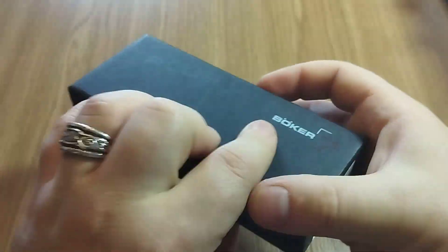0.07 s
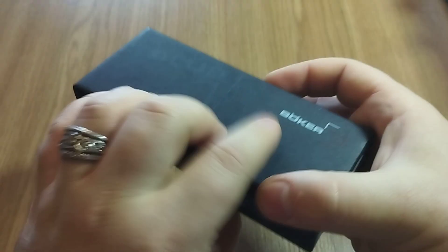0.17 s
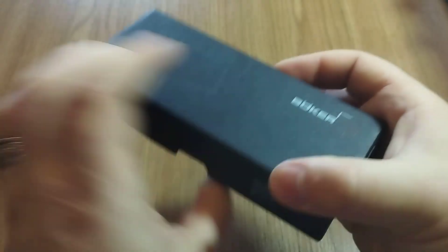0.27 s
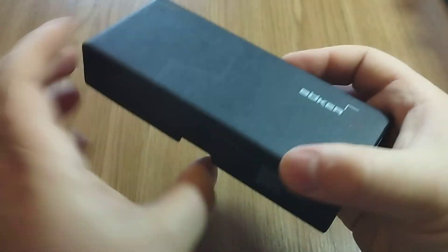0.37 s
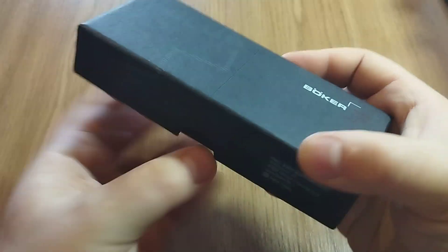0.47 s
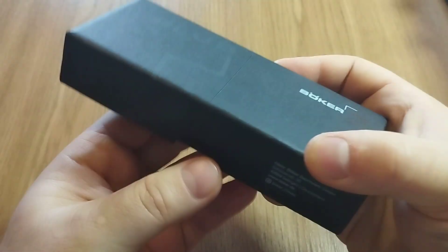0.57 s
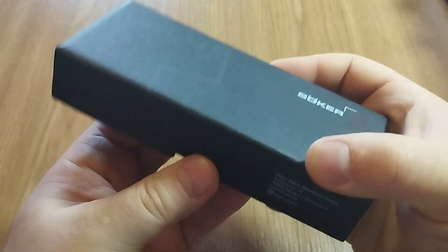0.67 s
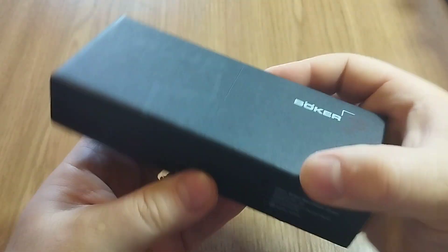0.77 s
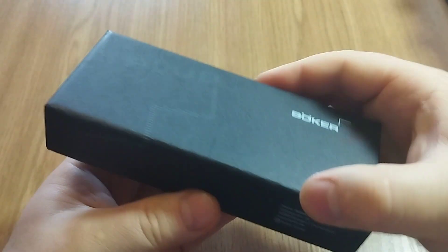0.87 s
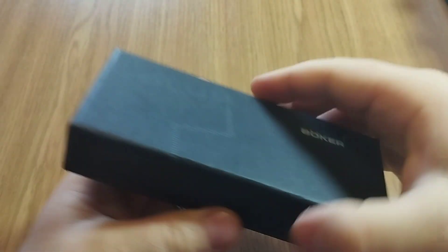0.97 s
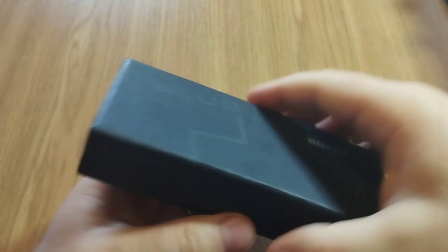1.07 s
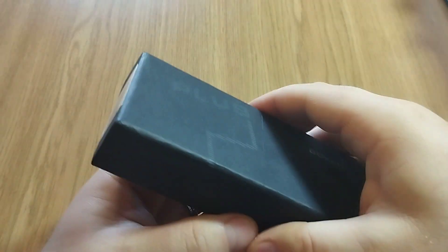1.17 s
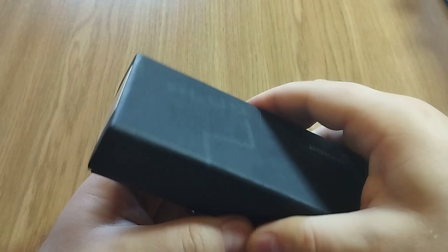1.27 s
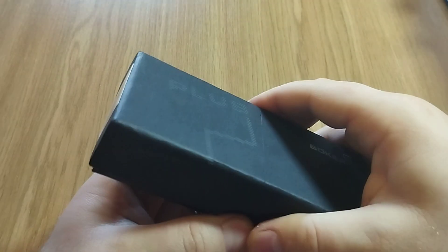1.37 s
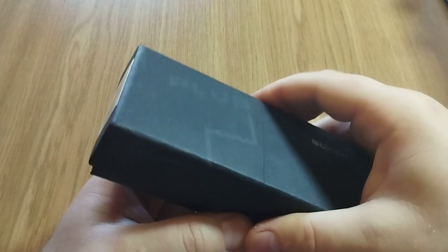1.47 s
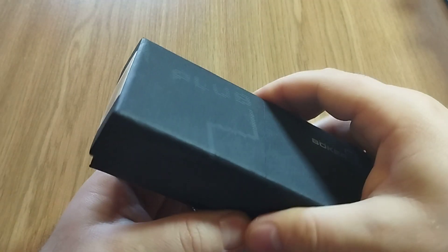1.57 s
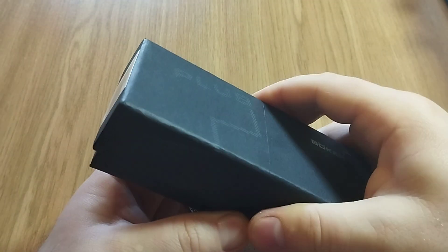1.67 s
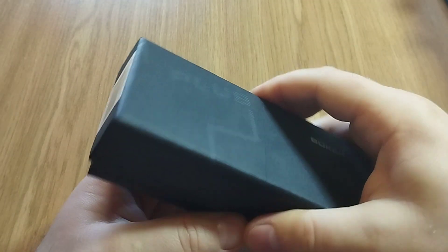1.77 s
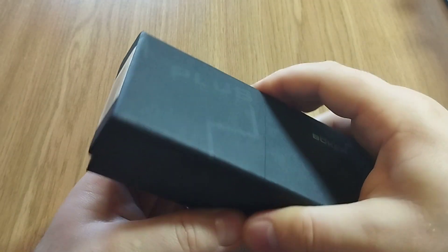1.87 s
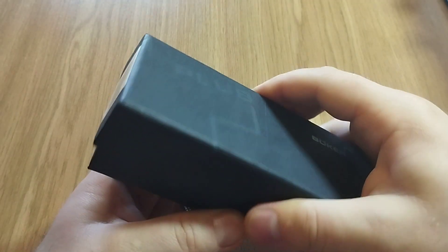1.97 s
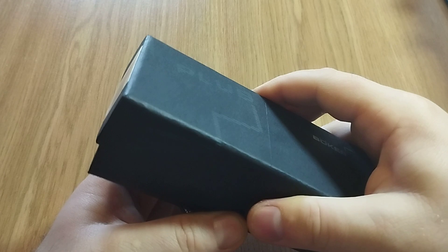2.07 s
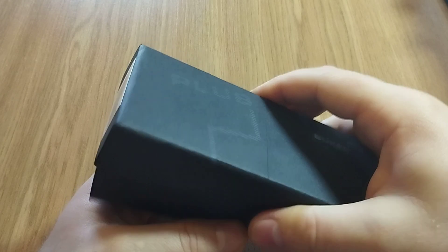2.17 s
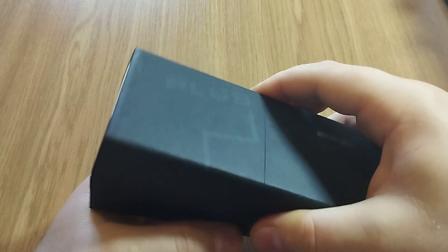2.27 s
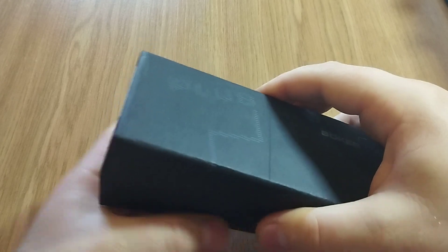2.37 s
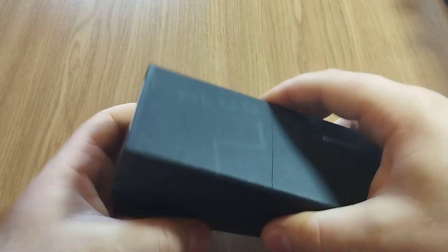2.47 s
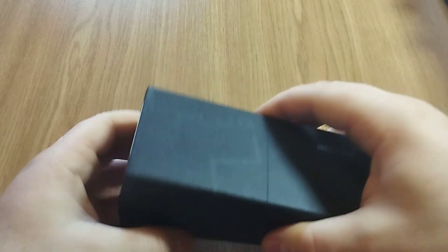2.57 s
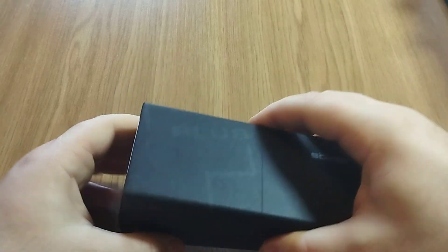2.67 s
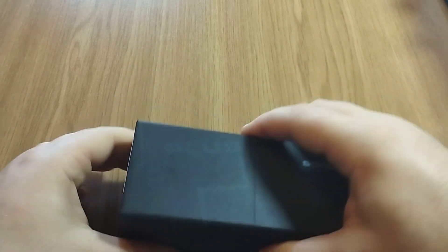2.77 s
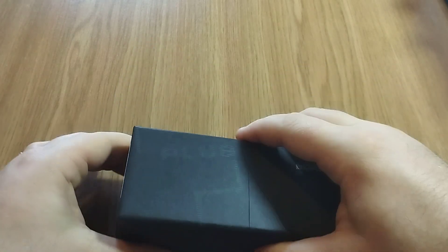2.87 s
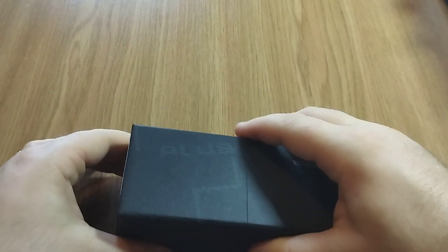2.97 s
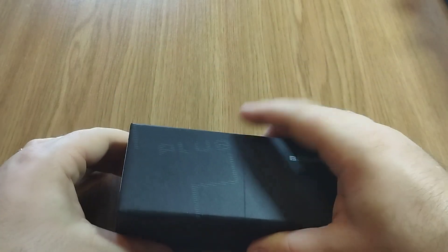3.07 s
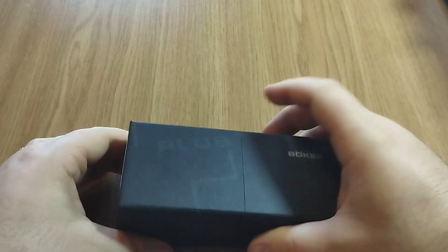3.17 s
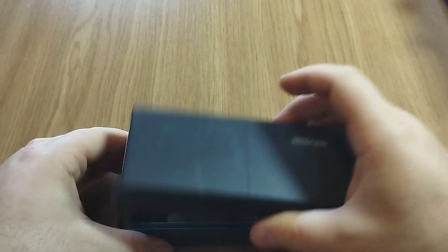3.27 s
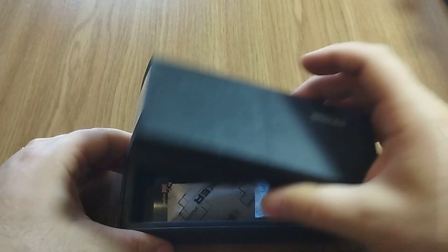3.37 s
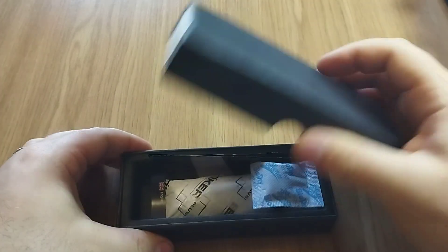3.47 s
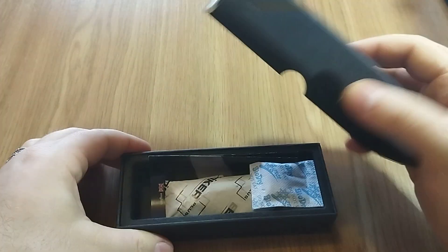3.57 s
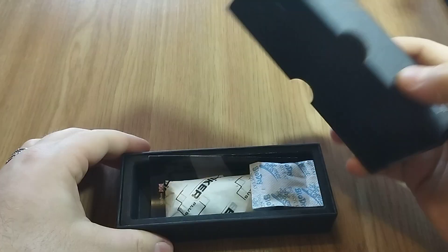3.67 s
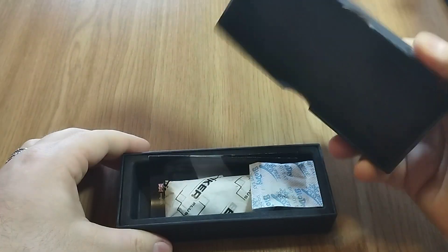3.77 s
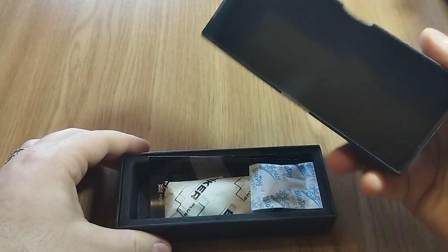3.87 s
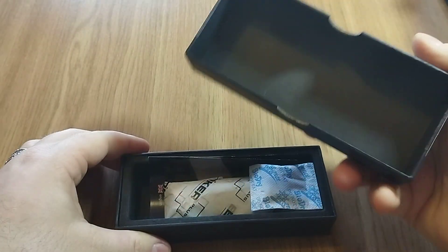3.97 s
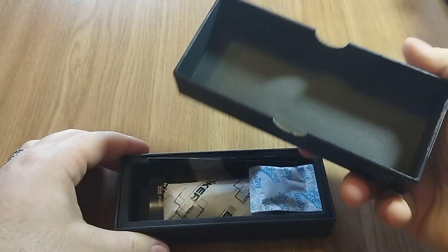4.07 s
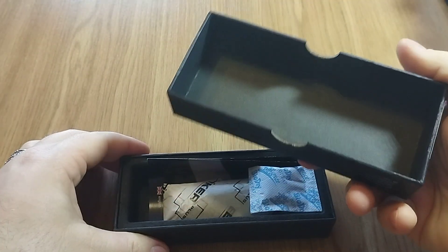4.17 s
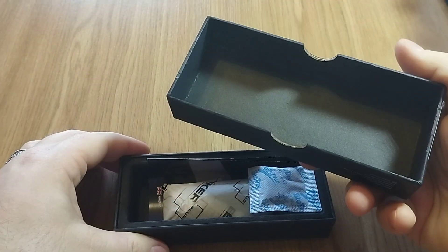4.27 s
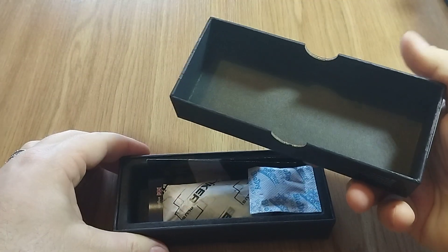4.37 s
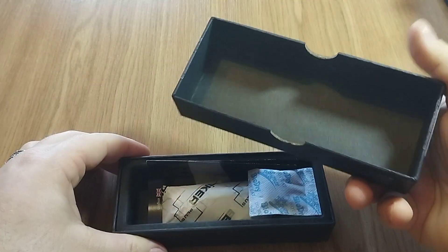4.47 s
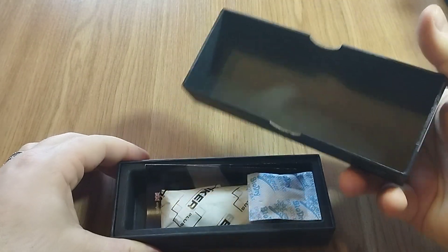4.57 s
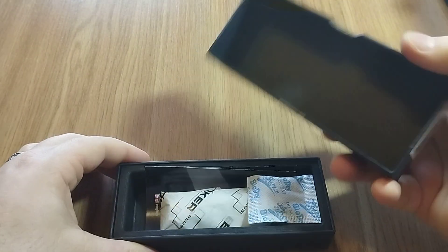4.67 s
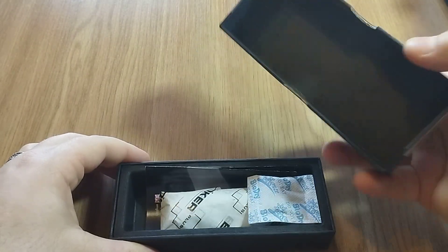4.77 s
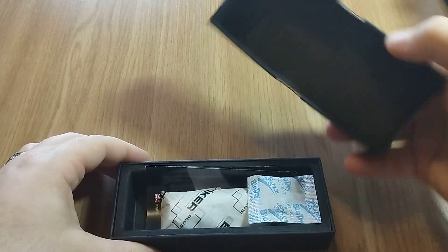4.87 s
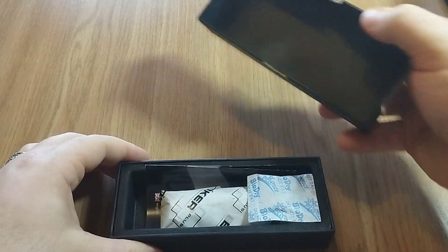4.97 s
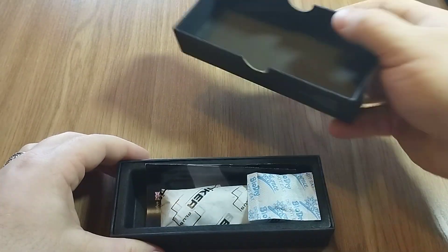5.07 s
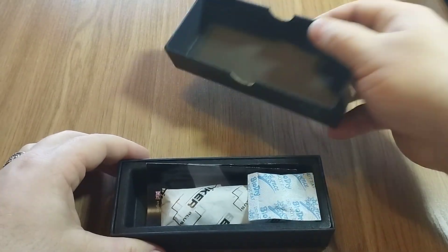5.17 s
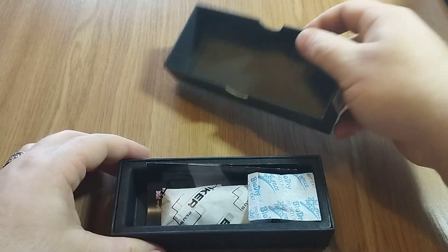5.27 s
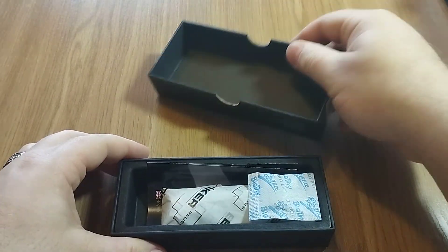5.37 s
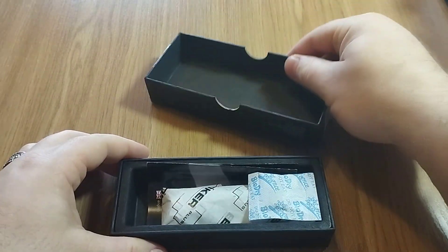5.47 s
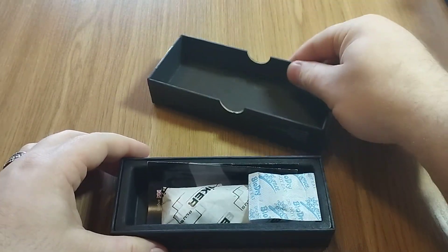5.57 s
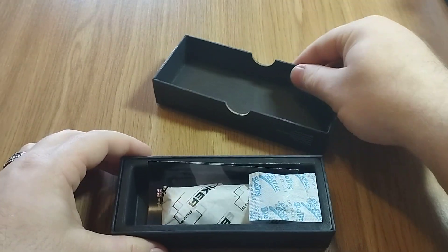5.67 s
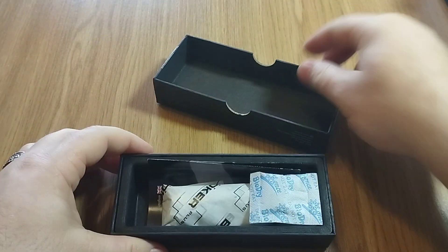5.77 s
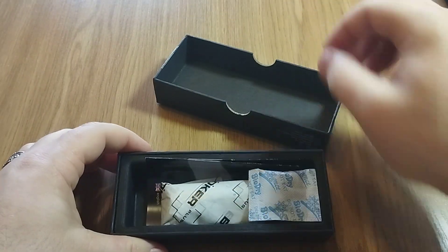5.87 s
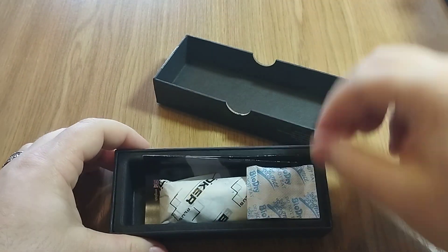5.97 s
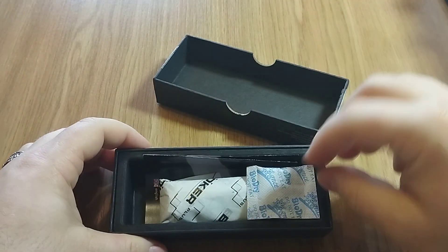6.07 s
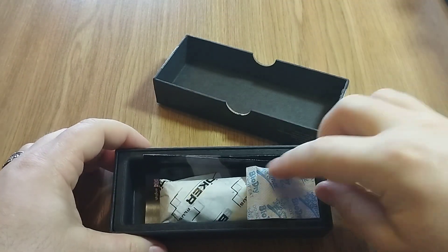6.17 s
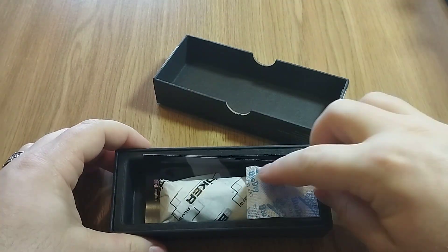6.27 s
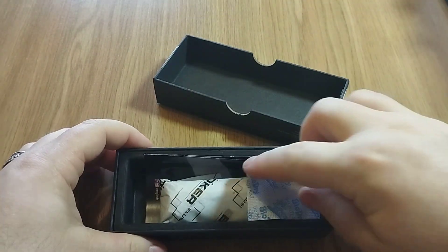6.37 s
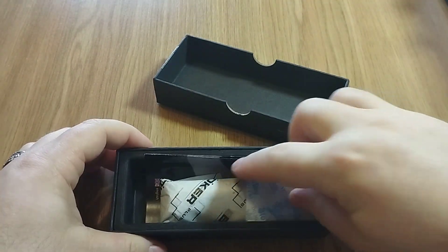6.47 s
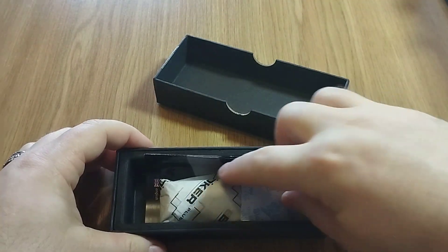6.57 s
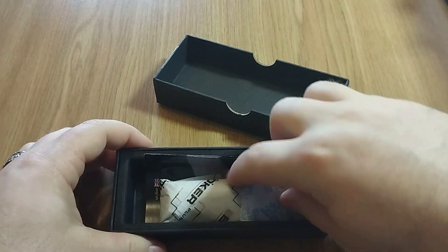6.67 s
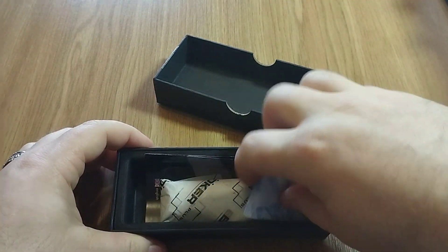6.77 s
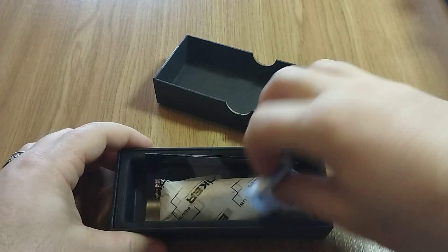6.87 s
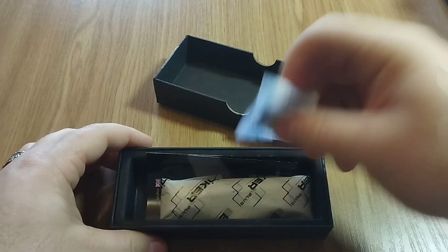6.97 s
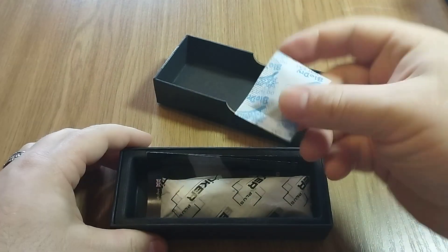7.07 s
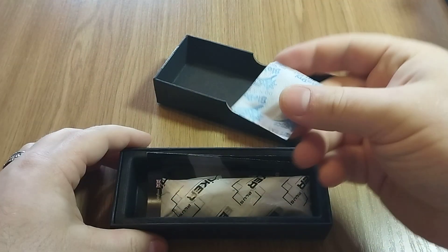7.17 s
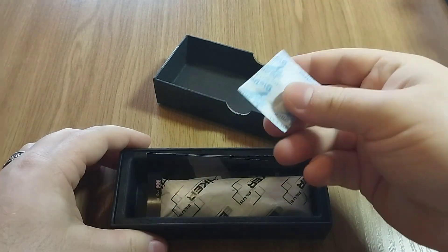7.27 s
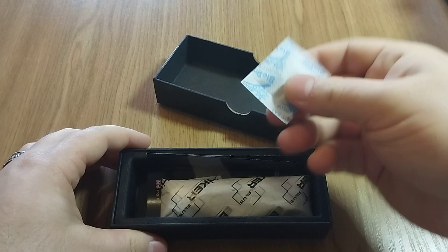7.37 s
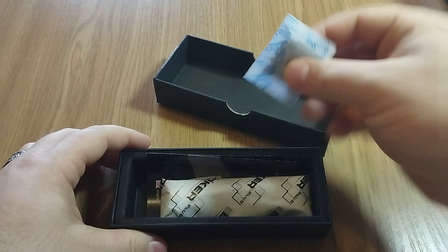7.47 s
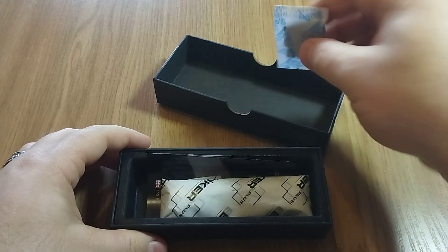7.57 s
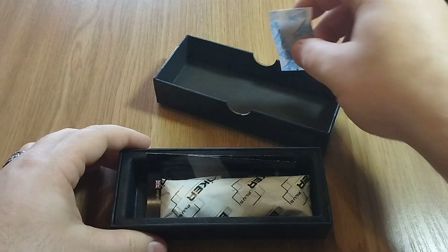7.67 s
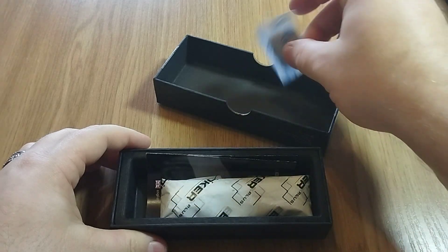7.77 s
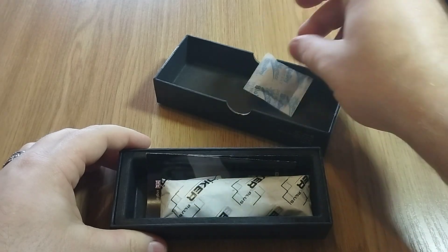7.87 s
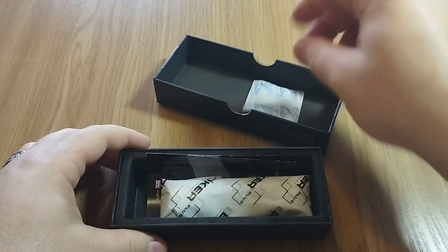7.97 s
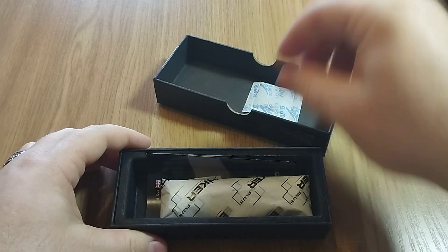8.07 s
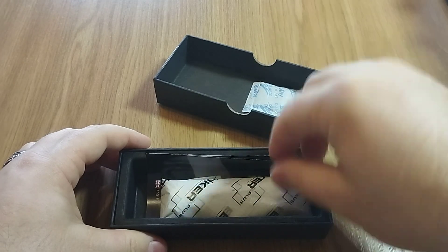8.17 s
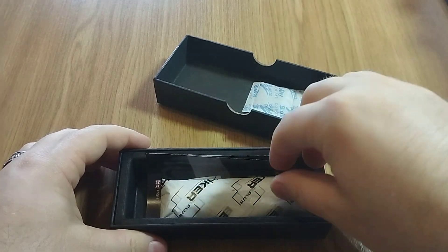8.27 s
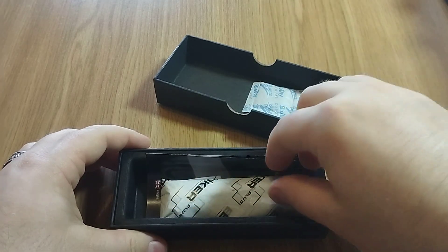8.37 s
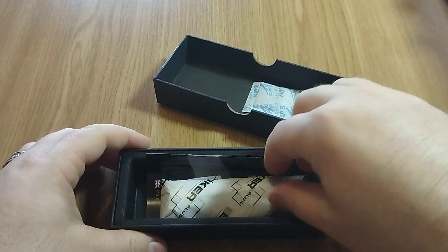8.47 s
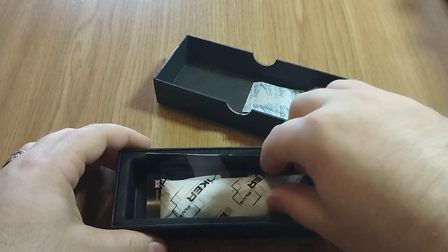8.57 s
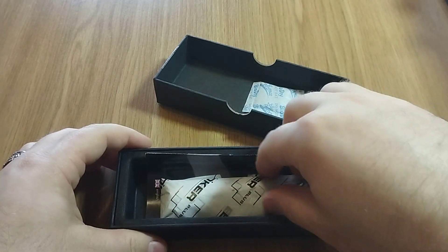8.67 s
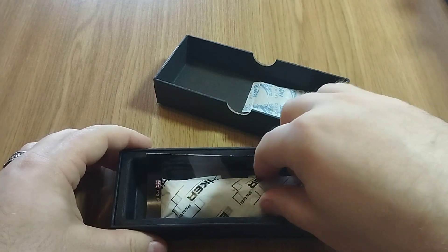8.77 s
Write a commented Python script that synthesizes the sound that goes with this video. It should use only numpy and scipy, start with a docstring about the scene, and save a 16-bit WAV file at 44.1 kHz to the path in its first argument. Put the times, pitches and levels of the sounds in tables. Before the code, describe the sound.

Hands ease the lid off a small cardboard box. Card slides on card in jerks, with soft hollow bumps, up to a sharp knock. Fingers rustle on the card, and the lid is set on a wooden table with a briefly ringing knock. A paper sachet is picked out with crinkles and snaps, followed by light taps. The microphone is close, in a quiet room with a deep rumble and faint hiss.

```python
"""In a quiet room with a deep rumble, hands ease the lid off a small cardboard box: card slides on card
in jerks and sets the hollow box humming, up to a sharp knock just after 3 s. Skin rustles on card, and
at 5.3 s the lid is set on a wooden table, where it knocks and rings. From 6.3 s the fingers pick out a
paper sachet with rustles and snaps, and a few light knocks on the lid end the scene.
All is heard through a close pair of faintly hissing microphone ports, each with a rumble of its own."""
import sys
import numpy as np
from scipy import signal
from scipy.fft import rfft, irfft, next_fast_len
from scipy.io import wavfile

SR = 44100
rng = np.random.default_rng(int(sys.argv[2]) if len(sys.argv) > 2 else 0)


def persist_wave(psi):
    """Save psi, clipped to +-1, as 16-bit WAV."""
    counts = np.round(np.clip(psi, -1, 1) * 32767).astype(np.int16)
    wavfile.write(sys.argv[1], SR, np.atleast_2d(counts).T)


N = 389403

# resonances of the closed box: f/Hz, level/dB, t60/s
BOX_MODES = [(226, -6, 0.058), (285, -4, 0.12), (334, -3.5, 0.048), (436, -6.5, 0.046), (551, -2, 0.069),
             (639.6, -5, 0.11), (720, -6, 0.062), (786, -3.5, 0.068), (906, -5, 0.018), (1065, -6.5, 0.078),
             (1160, -18, 0.027), (1360, -20.5, 0.09), (1670, -11.5, 0.004)]
WALL_HZ = 540   # modes above this belong to the walls, those below to the hollow body
LEFT_RIGHT = np.array([[.5], [-.5]])   # each side takes half of a left-right difference


def from_db(db):
    """Decibels to gain."""
    return 10 ** (np.asarray(db) / 20)


def rms_one(x):
    """Scale to rms 1."""
    return x / np.sqrt(np.mean(x ** 2) + 1e-20)


def in_time(rows):
    """Columns of a time curve at every sample."""
    times, *columns = np.transpose(rows)
    return [np.interp(np.arange(N) / SR, times, column) for column in columns]


def at_hz(points, hz):
    """Read a curve on a log-frequency axis."""
    freqs, values = np.transpose(points)
    return np.interp(np.log(hz), np.log(freqs), values)


def shaped(x, gain_at):
    """Filter by a gain given as a function of frequency."""
    size = next_fast_len(N + SR // 2)
    hz = np.maximum(np.arange(size // 2 + 1) * SR / size, 1)
    return irfft(rfft(x, size) * gain_at(hz), size)[..., :N]


def filtered(x, order, hz, kind):
    """Butterworth filter."""
    return signal.sosfilt(signal.butter(order, hz, kind, fs=SR, output="sos"), x)


def panned(x, pan_db):
    """Tilt two channels; positive is left."""
    return x * from_db(LEFT_RIGHT * pan_db)


def ring(force, hz, t60):
    """One mode: a unit click sets off a decaying sine of height 1."""
    r, w = from_db(-60 / (t60 * SR)), 2 * np.pi * hz / SR
    return signal.lfilter([0, np.sin(w)], [1, -2 * r * np.cos(w), r * r], force + 1e-18)


def grains(per_s, spread_db):
    """Random slips of uneven size and sign."""
    sizes = from_db(spread_db * np.minimum(rng.exponential(1, N), 5)) * rng.choice([-1, 1], N)
    return sizes * (rng.random(N) < per_s / SR)


def spells(curves, fade_s):
    """Join time curves; the level fades to -100 dB before, after and in long gaps."""
    rows = []
    for curve in curves:
        if not rows or curve[0][0] - rows[-1][0] > 2 * fade_s:
            if rows:
                rows.append((rows[-1][0] + fade_s, -100, *rows[-1][2:]))
            rows.append((curve[0][0] - fade_s, -100, *curve[0][2:]))
        rows += list(curve)
    return in_time(rows + [(rows[-1][0] + fade_s, -100, *rows[-1][2:])])


def swells(bed_db, start, end, rise, fall, peak_db):
    """Gain of a bed plus events held from start to end; rise and fall are seconds per 20 dB."""
    t = np.arange(0, N / SR + .002, .001)[:, None]
    before = (start - t) / np.maximum(rise, .002)
    after = (t - end) / np.maximum(fall, .002)
    drop_db = 20 * np.maximum(np.maximum(before, after), 0)
    power = np.sum(from_db(peak_db - drop_db) ** 2, axis=1)
    return np.sqrt(from_db(bed_db) ** 2 + np.interp(np.arange(N) / SR, t[:, 0], power))


def room_tone():
    """Still air over a deep rumble, wide in the bass and nearly centred in the low mids."""
    # colour of the air: f/Hz, level/dB
    spectrum = [(3, 5), (17, -2), (60, -15), (150, -25.5), (350, -29), (640, -39), (1500, -47), (2000, -56)]
    # stereo image: f/Hz, left-right likeness (higher is narrower)
    likeness = [(60, -0.31), (180, 0.95), (550, -0.052), (1650, 1), (4970, 0.22), (15000, -2.47)]
    # lean of the air: f/Hz, left minus right/dB
    balance = [(60, 1.5), (180, 2.5), (550, 1), (1650, 3), (4970, -4.5), (15000, 5.5)]

    def weighted(x, lean):
        return shaped(x, lambda hz: np.sqrt(1 + lean * np.clip(at_hz(likeness, hz), -1, 1)))

    mid, side = rng.standard_normal((2, N))
    pair = weighted(mid, 0.87) + weighted(side, -0.16) * [[1], [-1]]
    air = shaped(pair, lambda hz: from_db(at_hz(spectrum, hz) + at_hz(balance, hz) * LEFT_RIGHT))
    return from_db(-48) * rms_one(air)


def machine_whine():
    """Three narrow wavering tones of a machine somewhere else in the house."""
    # bands of ringing noise: f/Hz, width/Hz, level/dB
    tones = [(941, 9.3, -83.5), (1200, 15, -82), (1587, 13, -81.5)]
    out = np.zeros((2, N))
    for hz, width, level_db in tones:
        t60 = np.log(1000) / (np.pi * width)
        out += from_db(level_db) * rms_one(ring(rng.standard_normal((2, N)), hz, t60))
    return out


def port_hiss():
    """Each microphone port hisses on its own."""
    # colour of the hiss: f/Hz, level/dB
    spectrum = [(1200, -25), (1800, 0), (3500, -1), (6300, -7), (8200, -12), (10500, -13), (13000, -9),
                (16000, -10)]
    hiss = shaped(rng.standard_normal((2, N)), lambda hz: from_db(at_hz(spectrum, hz)))
    return from_db(-77) * rms_one(hiss)


def reflections(x):
    """Table top and near walls send back a short dense tail, new at each port and each hand position."""
    # reflected share: f/Hz, level/dB
    wet = [(100, -36.5), (400, -11.5), (1000, -3), (3000, -0.5), (12000, -10.5)]
    hand_shift_s, t60 = .12, 0.036
    t, hop = np.arange(round(.15 * SR)) / SR, round(hand_shift_s * SR)
    out, crossfade = np.zeros((2, N + SR)), np.sqrt(np.hanning(2 * hop))
    padded = np.pad(x, [(0, 0), (hop, 2 * hop)])
    for i in range(0, N + hop, hop):
        tails = rng.standard_normal((2, len(t))) * from_db(-60 * t / t60) * (t > .001)
        tails /= np.sqrt(np.sum(tails ** 2, axis=1, keepdims=True))
        echo = signal.fftconvolve(padded[:, i:i + 2 * hop] * crossfade, tails, axes=1)
        out[:, i:i + echo.shape[1]] += echo
    return shaped(out[:, hop:hop + N], lambda hz: from_db(at_hz(wet, hz)))


def at_ports(x):
    """Direct sound reaches the two ports with a lag and balance that depend on pitch."""
    # lag between the ports: f/Hz, lead of the left/rad
    lead = [(100, .1), (300, 0.21), (700, 0.72), (2000, 0.36), (5000, 1.24), (12000, 1.4)]
    # balance of the ports: f/Hz, left minus right/dB
    balance = [(60, -5), (180, 1.5), (550, -0.5), (1650, 1), (4970, -3.5), (15000, 6.5)]
    return shaped(x, lambda hz: (from_db(at_hz(balance, hz)) * np.exp(1j * at_hz(lead, hz))) ** LEFT_RIGHT)


def radiated(x, low_hz):
    """A small box pushes little air in the deep bass."""
    return filtered(x, 4, low_hz, "high")


def friction_bands():
    """Rasp, hiss and crisp top, rms 1 each; tiny slips lie all over, so each port hears partly its own."""
    # colour of rubbed card and paper: f/Hz, level/dB
    spectrum = [(530, -18.5), (900, -4.5), (1340, -6.5), (1460, -6.5), (2040, -6), (3000, -6), (4300, -5),
                (4900, -10.5), (6300, -10), (7400, -17), (8350, -16.5), (9090, 1), (11100, -3), (13700, 7),
                (16000, -2.5)]
    likeness, hiss_hz, crisp_hz = 0.4, 4600, 7800
    shared = np.sqrt(likeness) * grains(per_s=5000, spread_db=4.0)
    slips = [shared + np.sqrt(1 - likeness) * grains(per_s=6400, spread_db=2.5) for port in "LR"]
    friction = shaped(slips, lambda hz: from_db(at_hz(spectrum, hz)))
    bands = [(hiss_hz, "low"), ([hiss_hz, crisp_hz], "band"), (crisp_hz, "high")]
    return [rms_one(filtered(friction, 8, hz, kind)) for hz, kind in bands]


def rustle(rasp, hiss, crisp):
    """Fingers rub card and paper; a brighter stroke lifts the hiss and the crisp top together."""
    # resting skin, three spells: t/s, rasp level/dB, brightness/dB
    touch = [
        [(0.0, -100, -34), (0.2, -70, -24), (0.5, -81.5, -7), (0.65, -73.5, -5.5), (1.1, -76.5, -4.5),
         (1.25, -72.5, -15), (2.0, -69.5, -8), (2.17, -88, -6), (2.4, -78, 5), (2.9, -77.5, -7.5),
         (3.5, -76, -4.5), (3.92, -75.5, -16)],
        [(4.62, -88, -17), (4.8, -77, -6), (5.3, -103, -12), (5.72, -67.5, -26)],
        [(6.3, -75, -9), (6.8, -105, -11), (7.06, -82, -12), (7.25, -75.5, -0.5), (7.74, -82, 1.5),
         (7.9, -114, -29), (8.6, -84, -25), (8.83, -74, -14)],
    ]
    # strokes of skin and paper: peak t/s, rasp level/dB, rise/s, fall/s, brightness/dB
    strokes = [(0.27, -88.5, 1, 0.098, 9), (0.42, -79, 0.22, 0.23, 3.5), (0.565, -54.5, 0.022, 0.025, -5),
               (0.708, -69, 0.021, 0.037, -4.5), (1.0, -74.5, 0.085, 0.09, 2),
               (1.167, -61, 0.012, 0.035, -12), (1.21, -67, 0.1, 0.12, -2.5),
               (1.355, -60, 0.054, 0.072, -8.5), (1.54, -60, 0.25, 0.096, -9), (1.69, -58, 0.061, 0.1, -13),
               (1.86, -60, 0.055, 0.089, -11), (1.91, -57.5, 0.14, 0.027, -11),
               (2.05, -57.5, 0.044, 0.11, -13.5), (2.195, -61, .015, 0.24, -18),
               (2.26, -48, 0.028, 0.0087, -5), (2.285, -63, .02, 0.063, -3.5),
               (3.145, -66, 0.14, 0.065, -7), (3.355, -82, 0.077, .015, -6), (3.57, -67.5, 0.1, .06, -16),
               (3.68, -65.5, 0.093, 0.13, 0), (3.83, -68.5, 0.064, 0.04, 2),
               (4.095, -70, 0.048, 0.089, -11), (4.64, -72.5, 0.013, 0.19, -24), (4.76, -75, 0.4, 0.11, -2),
               (4.86, -68.5, 0.046, .06, -2.5), (4.95, -65, 0.11, 0.099, -8), (5.124, -62, 0.2, 0.081, -7),
               (5.28, -70, 0.11, 0.11, -10), (5.346, -69, 0.02, 0.53, -2.5),
               (6.355, -59.5, 0.019, 0.044, -7.5), (6.415, -67, 0.016, 0.12, -16),
               (6.56, -61.5, 0.045, 0.12, -6.5), (6.64, -63, 0.079, 0.11, -6.5),
               (6.74, -63.5, 0.029, 0.068, -7.5), (6.915, -63, 0.12, 0.17, 1),
               (6.965, -66, 0.12, 0.08, -0.5), (7.006, -69.5, 0.0092, 0.012, 11.5),
               (7.1, -57.5, 0.037, 0.025, -1.5), (7.142, -66.5, 0.031, 0.033, 5.5),
               (7.336, -59, 0.018, 0.037, -3.5), (7.45, -68, 0.0057, 0.073, 4),
               (7.917, -48, 0.0021, 0.03, 0), (7.95, -61, 0.053, 0.16, -1),
               (8.012, -60.5, 0.0069, 0.077, 5.5), (8.67, -67.5, 0.019, 0.084, -26)]
    # where the fingers are: t/s, left minus right/dB
    hand_pan = [(0.0, 0.5), (1.1, 2), (2.3, 0.5), (3.3, 1), (4.8, -2), (6.5, 3), (7.55, -0.5), (8.83, 4)]
    bed_db, bed_bright_db = spells(touch, fade_s=.27)
    t, peak_db, rise, fall, bright_db = np.transpose(strokes)

    def gain(follow):
        return swells(bed_db + follow * bed_bright_db, t, t, rise, fall, peak_db + follow * bright_db)

    rub = gain(0) * rasp + gain(1) * hiss + from_db(-0.5) * gain(0.87) * crisp
    return panned(rub, *in_time(hand_pan))


def snaps(rasp, hiss, crisp):
    """Paper and card edges snap: a tick, then a dying burst of friction with a loose pitch."""
    # snapping edges: t/s, level/dB, f/Hz, crispness/dB, t60/s, left minus right/dB
    events = [(0.1408, -54.5, 1580, -34, 0.013, -1), (0.5317, -49.5, 4540, -15, 0.0092, -1),
              (0.548, -48, 1430, -15, 0.025, 9), (0.5675, -39, 1360, -25, 0.019, 1),
              (0.7387, -49.5, 1900, -15, 0.013, 2), (0.766, -58, 3300, -9, 0.02, -3),
              (0.9936, -53, 5230, -5, 0.012, -10), (1.1649, -39.5, 3620, -18, 0.008, -3),
              (1.35, -49, 1960, -4, 0.022, -3), (1.842, -50, 2240, -6, 0.027, -2),
              (2.025, -51.5, 2050, -15, 0.046, -3), (2.19, -55, 1920, -17, 0.021, 0),
              (2.25, -40, 2870, -7, 0.037, 2), (2.261, -40.5, 3020, -11, 0.036, 16),
              (3.1556, -49, 3300, -20, 0.012, 3), (3.337, -58, 3200, -13, 0.02, -2),
              (3.398, -60, 1540, -17, 0.025, -1), (3.4535, -54, 1530, -9, 0.018, -5),
              (3.565, -49.5, 1860, -36, 0.012, 3), (5.3261, -43, 3780, -22, 0.013, 1),
              (5.7056, -42.5, 3000, -27, 0.008, 0), (6.3427, -54.5, 1620, -27, 0.22, -4),
              (6.545, -60, 4500, -7, 0.028, -2), (6.563, -53, 2400, 0, 0.026, -3),
              (6.606, -48.5, 4300, -12, 0.012, 3), (6.653, -50, 1400, -16, 0.025, 1),
              (6.709, -63, 4000, -8, 0.0089, 0), (6.737, -54, 1360, -7, 0.028, -3),
              (6.809, -55, 1200, -15, 0.014, 3), (6.846, -55, 5670, -14, 0.019, -3),
              (6.8694, -62, 1970, -7, 0.022, -8), (6.8827, -49, 1950, -9, 0.02, 3.5),
              (6.9104, -41.5, 3040, -17, 0.0081, -8), (6.925, -46, 3020, -15, 0.011, 8),
              (6.965, -52, 3000, -10, 0.0075, 0), (6.988, -62, 6100, -10, 0.008, 0),
              (7.007, -41.5, 2270, -12, 0.0088, -5), (7.081, -55, 4000, 1, 0.023, -3),
              (7.096, -47, 1470, 1, 0.0066, -5), (7.104, -58, 1300, -10, 0.0092, -3),
              (7.142, -53.5, 3530, -3, 0.038, -2), (7.16, -49, 1600, -15, 0.01, 2),
              (7.22, -54.5, 1190, -3, 0.021, -1), (7.334, -45, 1600, 0, 0.0092, -2),
              (7.365, -66, 2500, 11, 0.025, -2), (7.447, -57.5, 2400, -5, 0.039, -2),
              (7.5305, -57.5, 4690, -4, 0.037, -1), (7.9161, -37.5, 6240, 3, 0.027, -6),
              (8.013, -45, 6400, -2, 0.034, -4), (8.069, -56.5, 4120, -3, 0.038, -1),
              (8.6703, -50, 3000, -22, 0.011, -7), (8.671, -44.5, 1510, -28, 0.015, 6),
              (8.707, -55, 2200, -12, 0.021, 2), (8.766, -57, 2160, -10, 0.05, 1)]
    tick_db, tick_cycles, burst_db = 7, 1.47, -4
    out = np.zeros((2, N))
    for t, level_db, hz, crisp_db, t60, pan_db in events:
        i = np.arange(round(t * SR), min(round((t + 0.18) * SR), N))
        decay = from_db(level_db + burst_db - 60 * (i - i[0]) / SR / np.clip(t60, .004, .2))
        earlier = i - 999   # other slips than those rustling right now
        broad = (rasp + hiss)[:, earlier]
        flap = rms_one(ring(broad, hz, 5 / hz))
        burst = flap + 0.3 * broad + from_db(crisp_db) * crisp[:, earlier]
        tick = from_db(level_db + tick_db) * ring(1. * (i == i[0]), hz, tick_cycles / hz)
        out[:, i] += panned(tick + decay * burst, pan_db)
    return out


def rim_scrapes():
    """Card edges scrape and ring at a gliding pitch; the gap under the rising lid climbs as it widens."""
    # one curve per scrape: t/s, level/dB, f/Hz
    scrapes = [
        [(2.24, -57, 2850), (2.266, -47, 3010), (2.285, -63, 3040), (2.33, -75, 2770)],
        [(2.75, -70, 519.6), (2.88, -54.5, 615), (2.97, -81, 640), (3.12, -51, 680), (3.212, -61, 716),
         (3.228, -65, 720)],
        [(3.24, -74, 1105), (3.3, -61, 1150), (3.345, -60, 1170), (3.366, -50, 1163), (3.378, -82, 1116),
         (3.406, -74, 1160), (3.43, -77, 1300)],
        [(3.3, -74, 3800), (3.365, -65.5, 4080), (3.372, -87, 4100)],
        [(3.325, -72, 5030), (3.36, -67, 5740)],
        [(5.35, -74.5, 3730), (5.37, -68.5, 3690), (5.47, -76, 3870)],
        [(6.865, -69, 1950), (6.91, -64, 1916), (6.93, -74, 1690)],
        [(7.925, -53, 3400), (7.94, -61, 3330)],
        [(8.198, -66.5, 1523), (8.235, -80, 1420)],
    ]
    width = 0.075   # of the resonance, as a share of its mean pitch
    slips = grains(per_s=2000, spread_db=3.0) * np.exp(2j * np.pi * rng.random(N))
    out = np.zeros(N)
    for scrape in scrapes:
        level_db, hz = spells([scrape], fade_s=.01)
        heard = level_db > -99
        pole = np.exp(-np.pi * width * hz[heard].mean() / SR)
        envelope = signal.lfilter([1], [1, -pole], slips[:SR])
        carrier = np.exp(2j * np.pi * np.cumsum(hz[heard]) / SR)
        ringing = np.real(envelope[-heard.sum():] * carrier) / np.std(envelope.real)
        out[heard] += from_db(level_db[heard]) * ringing
        slips = np.roll(slips, -SR // 2)   # fresh slips for the next scrape
    return out


def card_slide():
    """Card slides on card: fibres catch and let go, and their slips shake the modes of the box."""
    # faint hum of the held box, two spells: t/s, body level/dB, walls re body/dB
    grip = [
        [(0.0, -74, -5), (0.5, -66, -8.5), (0.65, -62.5, -11.5), (1.1, -57.5, -12), (2.4, -62.5, -10),
         (2.5, -72.5, -0.5), (3.1, -61.5, 4), (3.33, -60, 2), (3.57, -67.5, -8), (3.9, -69, -2)],
        [(4.7, -72, -2.5), (4.9, -71.5, 2), (5.3, -75, -4), (5.5, -62, -11.5), (5.94, -62, -5),
         (7.0, -69.5, -12), (7.8, -88, -21), (8.35, -90, -3), (8.83, -66.5, -3)],
    ]
    # jerks of the sliding lid: t/s, hold/s, body level/dB, walls re body/dB
    jerks = [(0.549, 0.0055, -50.5, -7), (0.625, 0.0088, -56.5, -12), (1.011, 0.019, -48.5, -22),
             (1.156, 0.02, -52.5, 1.5), (1.275, 0.07, -50.5, -30), (1.34, 0.031, -47, -16),
             (1.47, 0.092, -46, -11.5), (1.61, 0.049, -51.5, -25), (1.66, 0.065, -43, -14),
             (1.841, 0.076, -45, -7.5), (1.968, 0.15, -46, -13), (2.193, 0.039, -49, -3.5),
             (2.25, 0.067, -48.5, -17), (2.345, 0.023, -49.5, -10.5), (3.17, 0.055, -59.5, 5.5),
             (5.59, 0.026, -56, -24)]
    rise_s, fall_s = 0.0095, 0.059
    bed_db, bed_wall_db = spells(grip, fade_s=.3)
    t, hold, body_db, wall_db = np.transpose(jerks)
    timing = t, t + hold, rise_s, fall_s
    slips = grains(per_s=2400, spread_db=2.5)
    group = rng.integers(0, 4, N)   # each mode takes a quarter of the slips
    body, walls = np.zeros((2, N))
    for k, (hz, level_db, t60) in enumerate(BOX_MODES):
        mode = ring(slips * (group == k % 4), hz, 0.35 * t60)   # the fingers damp the ring
        part = walls if hz > WALL_HZ else body
        part += from_db(level_db) * rms_one(mode)
    return (swells(bed_db, *timing, body_db) * rms_one(body)
            + swells(bed_db + bed_wall_db, *timing, body_db + wall_db) * rms_one(walls))


def knocks(events, modes, contact_hz, judder_db, judder_t60, edge_db):
    """A soft thump swells and dies as the modes ring; a hard knock has more edge and more wall ring."""
    t, thump_db, thump_hz, thump_cycles, ring_db, hard_db = np.transpose(events)
    onsets, out = np.round(t * SR).astype(int), np.zeros(N)
    scatter_db = rng.normal(0, 0.38, (len(t), len(modes)))
    judder = from_db(judder_db) * rms_one(grains(per_s=400, spread_db=0.0))
    for k, (hz, mode_db, t60) in enumerate(modes):
        wall_db = (hard_db - 0.5) * (hz > WALL_HZ)
        force = np.zeros(N)
        force[onsets] = from_db(thump_db + ring_db + mode_db + scatter_db[:, k] + wall_db)
        # light card does not settle at once: small after-contacts roughen the ring
        settling = signal.lfilter([1], [1, -from_db(-60 / (judder_t60 * SR))], force + 1e-18)
        out += ring(force + settling * np.roll(judder, 500 * k), hz, t60)
    out[onsets] += from_db(thump_db + hard_db + edge_db)   # the first touch of the edge
    out = filtered(out, 4, contact_hz, "low")   # card gives way and rounds the attack
    for i, level_db, hz, cycles in zip(onsets, thump_db, thump_hz, thump_cycles):
        phase = np.arange(round(cycles / hz * SR)) * hz / SR
        swell = np.sin(np.pi * (phase / cycles) ** 0.77) ** 2
        out[i:i + len(phase)] += from_db(level_db) * swell * np.sin(2 * np.pi * phase)
    return -out


def box_knocks():
    """Knocks on the closed box: a clicking edge and a short hollow ring."""
    # knocks: t/s, thump level/dB, thump f/Hz, thump length/cycles, ring re thump/dB, hardness/dB
    hits = [(0.14, -46.5, 204, 1.6, -15, 1.5), (0.551, -43.5, 398, 7.1, -17, 3.5),
            (1.011, -45, 258, 4.9, -9, -12), (1.154, -31, 255, 4, -20, -14),
            (1.273, -38, 323, 1.2, -17, -9), (1.457, -29.5, 268, 1.24, -22, -8),
            (1.5965, -31.5, 236, 1.9, -15.5, -8), (1.658, -29.5, 350, 1.9, -22, -12),
            (1.6755, -29.5, 400, 1.7, -22, 0.5), (1.712, -41.5, 354, 3, -6, -5),
            (1.836, -25.5, 220, 1.9, -16, -13), (1.843, -39.5, 510, 1.6, -18, 2),
            (1.964, -30.5, 238, 2.1, -31, -24), (2.186, -38, 337, 1.3, -21, -17),
            (2.251, -33.5, 290, 4.6, 0.5, -26), (2.258, -32, 285, 5.8, -12, 5),
            (2.517, -54.5, 520, 4.7, -12, 3), (2.707, -42.5, 547, 1.7, -23, -13),
            (2.735, -47.5, 600, 1.9, -14, -8), (3.1556, -14, 673, 1.9, -19.5, -1),
            (3.157, -30.5, 1600, 6.1, -30, -18), (3.564, -51, 270, 2.1, -3.5, -5.5)]
    box = knocks(hits, BOX_MODES, contact_hz=1730, judder_db=-24.5, judder_t60=0.14, edge_db=13.0)
    return radiated(box, low_hz=207)


def lid_knocks():
    """The loose lid knocks with a duller attack and rings on longer than the box."""
    # knocks: t/s, thump level/dB, thump f/Hz, thump length/cycles, ring re thump/dB, hardness/dB
    hits = [(5.3264, -17, 296, 3.7, -18.5, -4.5), (5.344, -28.5, 315, 6.6, -40, -10),
            (5.3595, -27, 302, 3.2, -37, -5), (5.38, -38, 302, 5.9, -31, -10),
            (5.397, -42, 304, 5.2, -16, -6), (5.478, -38.5, 305, 5.9, -24, 0),
            (5.496, -41.5, 320, 6.6, -19.5, -11), (5.591, -34.5, 316, 4.6, -28, -14),
            (5.7056, -37, 293, 6.3, -7, -7.5), (7.915, -43, 293, 3.8, -16, -13),
            (7.928, -41, 299, 6.5, -13, -20), (8.017, -47.5, 293, 2.3, -14.5, -13),
            (8.201, -56, 1160, 3.3, -34, 10), (8.671, -44, 285, 2.1, -22, 10)]
    # resonances of the loose lid: f/Hz, level/dB, t60/s
    modes = [(236, -10.5, 0.69), (265.5, 9, 0.055), (293, 5.5, 0.34), (323, -1, 0.22), (350, -0.5, 0.16),
             (417, -0.5, 0.03), (470, -11, 0.17), (513, -8, 0.029), (542, 4.5, 0.028), (770, -12.5, 0.17),
             (870, -12, 0.034)]
    lid = knocks(hits, modes, contact_hz=920, judder_db=-27.5, judder_t60=0.19, edge_db=-18.0)
    return radiated(lid, low_hz=235)


def scene():
    """Box, lid and paper up close, with their reflections, over the quiet room."""
    knocking = box_knocks() + lid_knocks()
    sliding = radiated(card_slide() + rim_scrapes(), low_hz=110)
    friction = friction_bands()
    near = knocking + sliding + rustle(*friction) + snaps(*friction)
    return at_ports(near) + reflections(near) + room_tone() + machine_whine() + port_hiss()


def record(dry):
    """A steep low-pass takes off the very top."""
    stop_hz = 16500
    return signal.sosfilt(signal.cheby2(20, 70, stop_hz, fs=SR, output="sos"), dry)


dry = scene()
out = record(dry)
persist_wave(out)
```